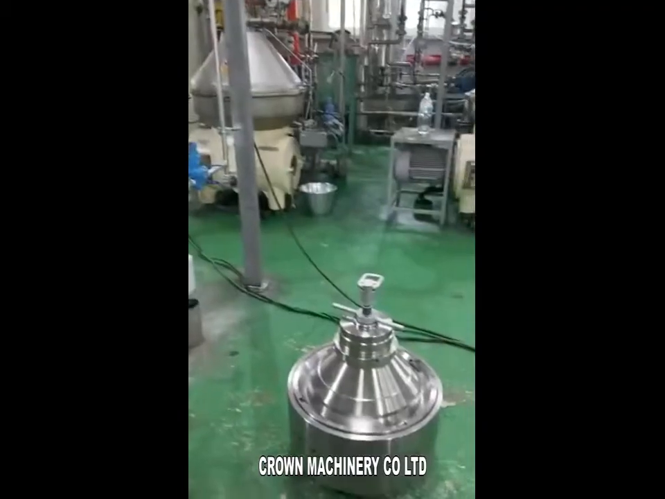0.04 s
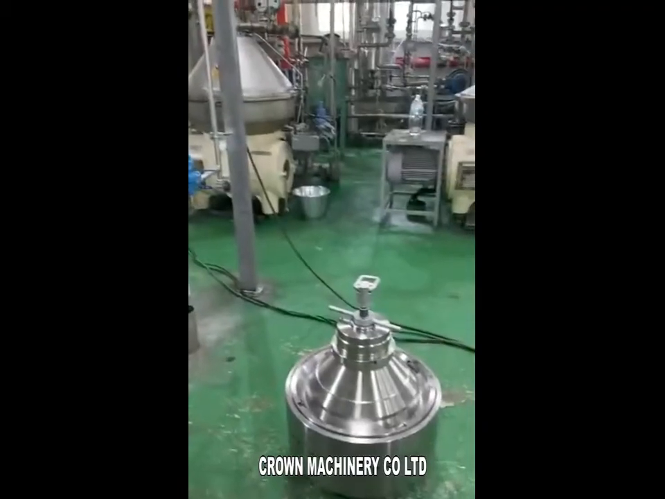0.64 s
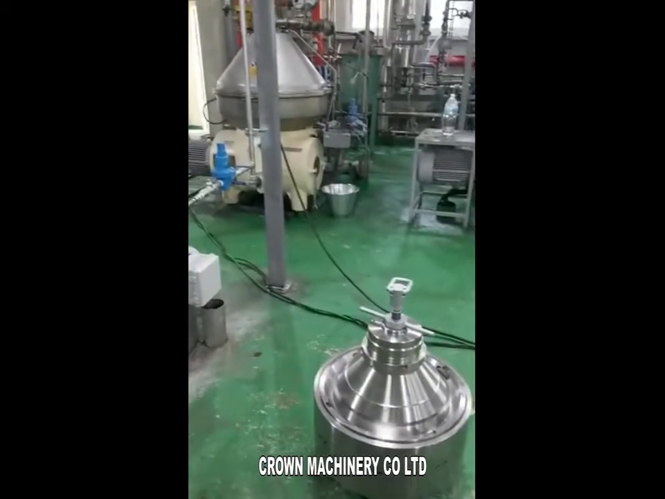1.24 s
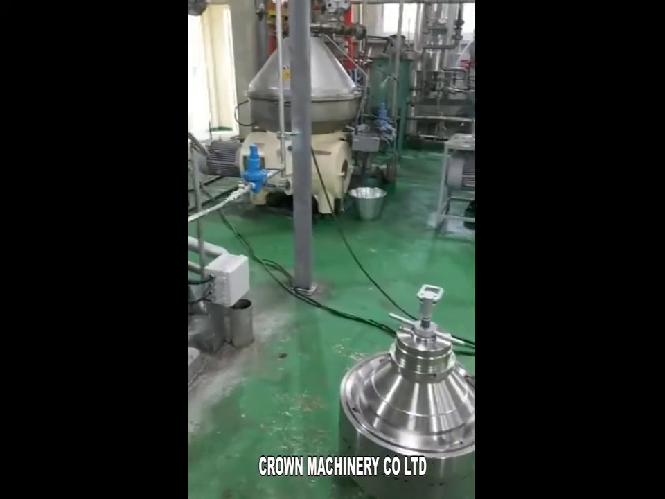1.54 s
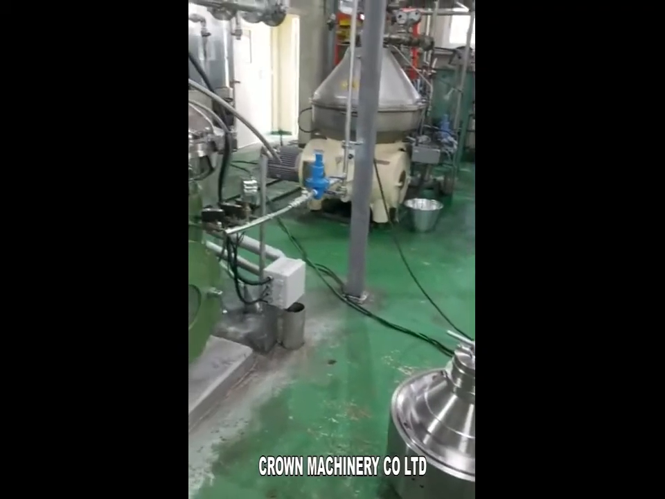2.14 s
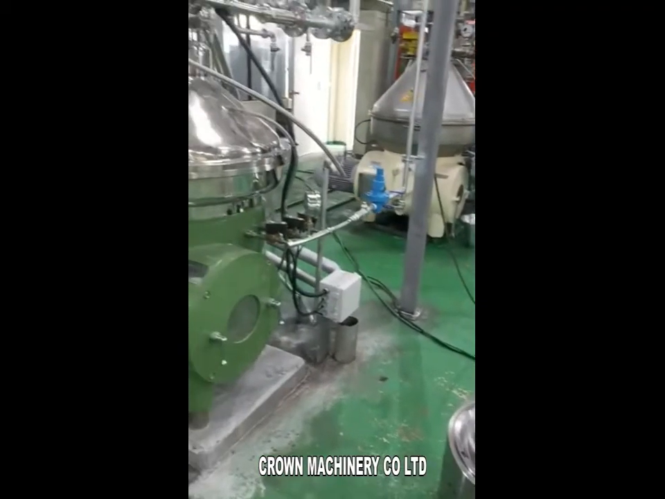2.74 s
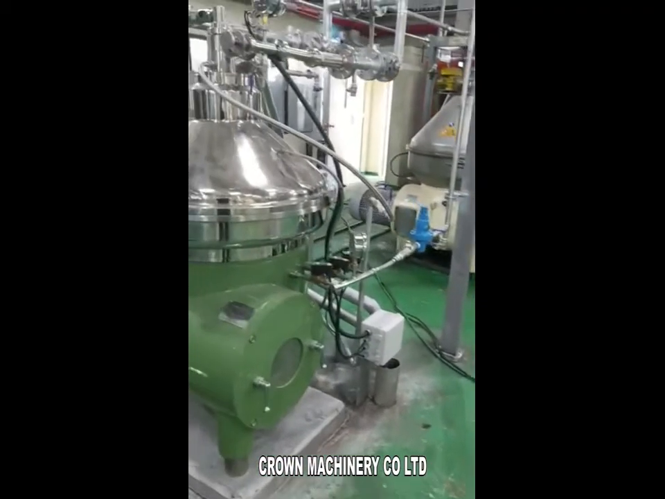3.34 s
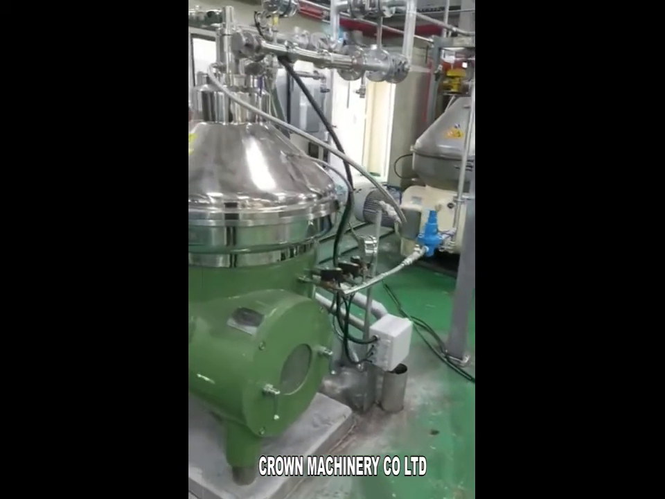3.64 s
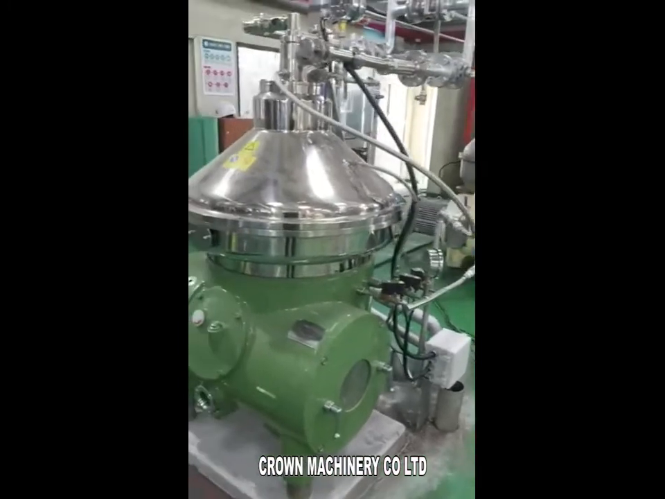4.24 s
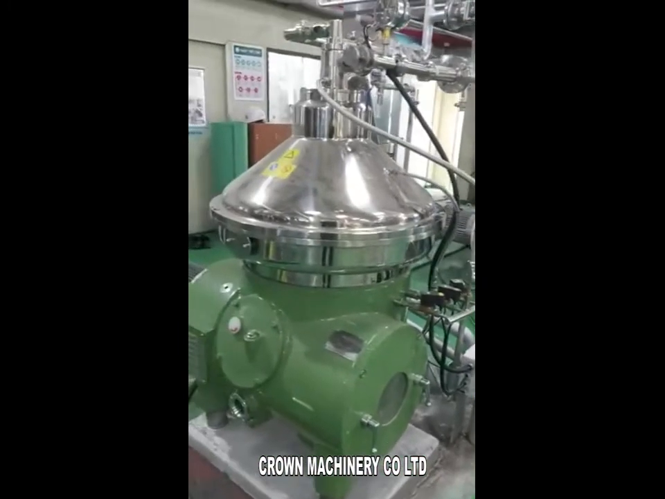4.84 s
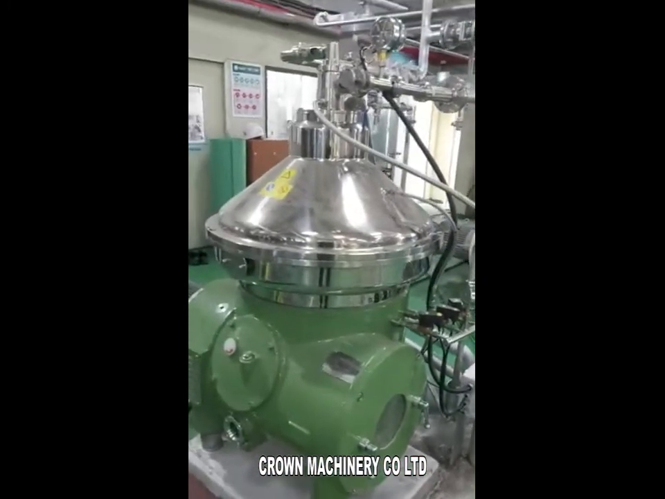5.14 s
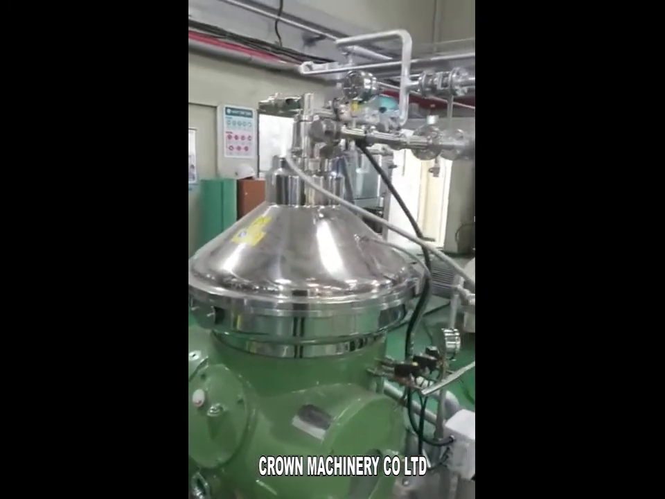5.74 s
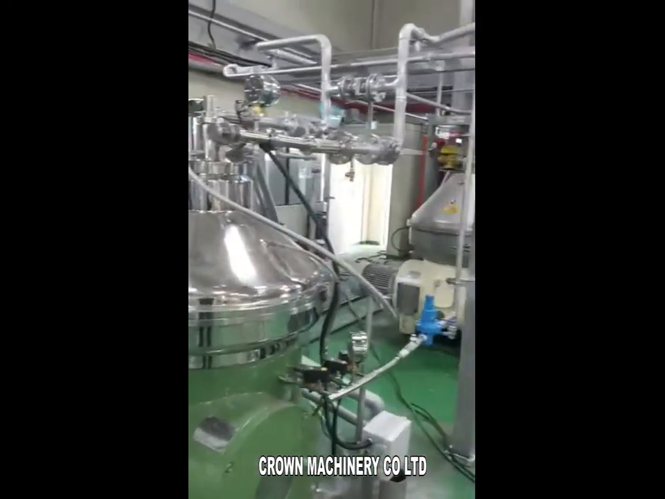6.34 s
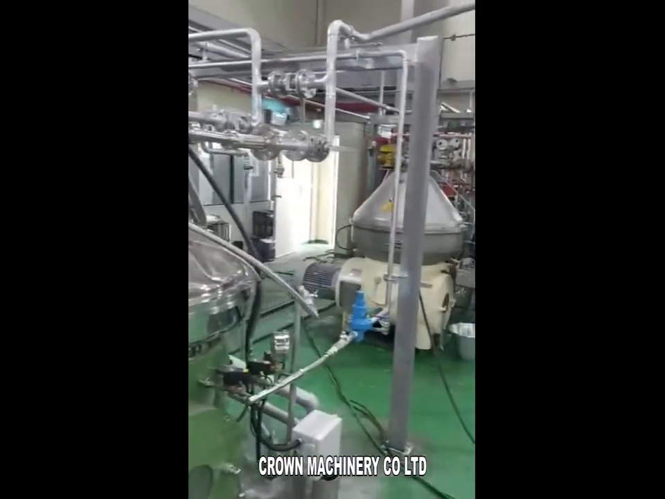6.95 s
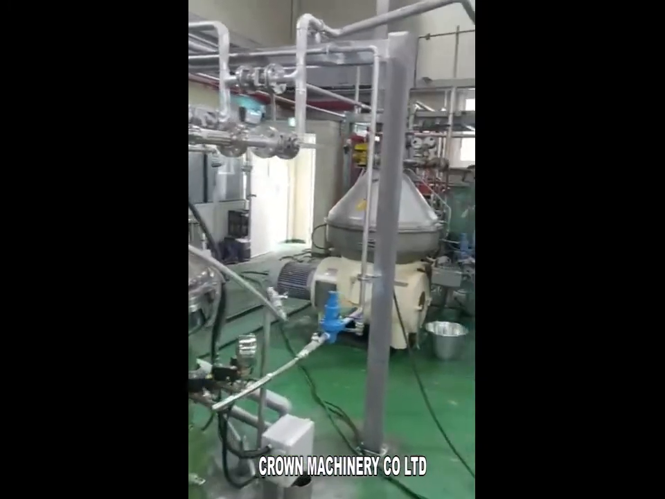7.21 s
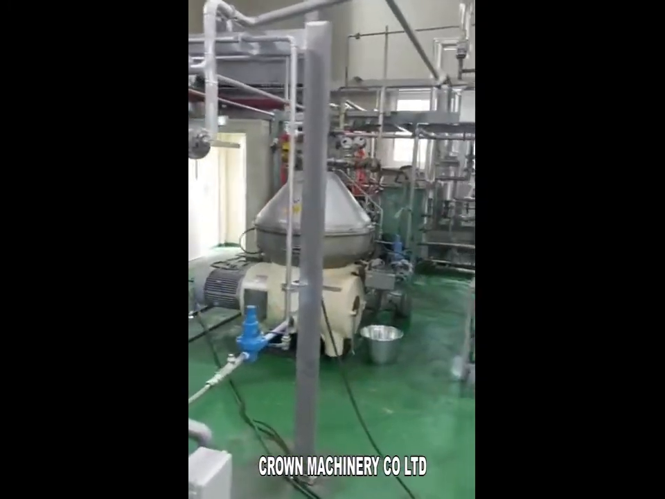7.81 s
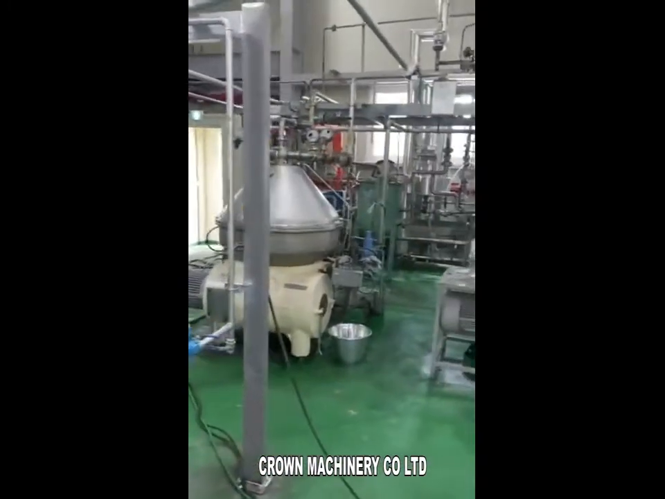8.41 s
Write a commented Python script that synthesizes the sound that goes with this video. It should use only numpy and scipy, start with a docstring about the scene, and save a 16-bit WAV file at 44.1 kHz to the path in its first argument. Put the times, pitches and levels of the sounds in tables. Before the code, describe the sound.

Several industrial centrifuges run at full speed in a hard-walled hall. A loud, airy hiss with a fine flicker dominates, over a low rumble and a faint motor hum that slowly pulses. The noise swells in the first second, then holds. A pump's low tone grows a little clearer in the second half. The microphone turns slowly among the machines, with the sound spread wide around it.

```python
"""Disc-stack centrifuges in a hard-walled hall

The listener turns slowly among machines at full speed. Air dragged along by the spinning bowls makes a
loud hiss. The hiss is heard with a fine flicker. Motors, gears and bowls hum through the cast frames over
a low rumble. Two drives at nearly the same speed beat slowly, and a pump's vane tone grows clearer."""
import sys
import numpy as np
from scipy import signal
from scipy.fft import rfft, irfft, next_fast_len
from scipy.io import wavfile
from scipy.ndimage import uniform_filter1d, map_coordinates

SR = 44100
rng = np.random.default_rng(int(sys.argv[2]) if len(sys.argv) > 2 else 0)


def unload_wav(signal):
    """Save mono or channel-first audio to the path in sys.argv[1] as 16-bit WAV at rate SR, clipped to [-1, 1]."""
    wavfile.write(
        sys.argv[1],
        SR,
        np.round(np.clip(np.atleast_2d(signal).T, -1, 1) * 32767).astype(np.int16),
    )


N = 373736


# Spectrum of the air rushing round the bowls. Each row: frequency in Hz, relative density in dB.
WINDAGE_SPECTRUM = [(800, -19.5), (1130, -9.5), (1280, -4), (1500, -2), (1950, -2), (2250, -3.5),
                    (2550, -5.5), (3000, -4.5), (3550, -2.5), (3950, 0), (4550, -0.4), (5100, -3.5),
                    (6400, -3.5), (7500, -6.5)]

def windage(treble_edge_hz=5300, window=1024):
    """Modulated noise: a hiss of rushing air, given patchy flicker, brief dips and a flickering width."""
    left, right = diffuse_noise(from_db(at_hz(WINDAGE_SPECTRUM, bin_hz())))
    hz, times, cells = signal.stft([left + right, left - right], SR, nperseg=window)
    treble = (hz > treble_edge_hz)[:, None]
    # flicker and grain are capped, so they dip further than they swell
    flicker = np.minimum(patches(hz, times, width_hz=903, length_s=.022, trend_frames=9), .092)
    grain = [patches(hz, times, width_hz=80, length_s=.026, trend_frames=15) for _ in ("mid", "side")]
    grain = np.minimum(grain, .063)
    ringing = patches(hz, times, width_hz=40, length_s=.16, trend_frames=81)
    mottle = patches(hz, times, width_hz=110, length_s=.05, trend_frames=21)
    dips = np.minimum(mottle + .9, 0)   # only the deepest troughs remain
    texture_db = np.where(treble, 3.0, 1.1) * flicker + 6 * grain + 1.8 * ringing + 14 * dips
    gain = from_db(texture_db) * flickering_width(hz, times, treble)
    gain /= np.sqrt(np.mean(gain ** 2, axis=2, keepdims=True))   # every band keeps its mean power
    mid, side = signal.istft(cells * gain, SR, nperseg=window)[1][:, :N]
    return rms_one(np.array([mid + side, mid - side]))


def flickering_width(hz, times, treble, bias_db=-8.5, spread_db=20.5):
    """Constant-power panning between mid and side: the treble flickers between narrow and wide."""
    flicker = patches(hz, times, width_hz=560, length_s=.026, trend_frames=9)
    side_ratio = from_db(treble * (bias_db + spread_db * flicker))
    return np.array([np.ones_like(side_ratio), side_ratio]) / np.sqrt(1 + side_ratio ** 2)


# Spectrum of the hall's rumble. Each row: frequency in Hz, relative density in dB.
RUMBLE_SPECTRUM = [(15, -30.5), (28, -9), (45, -4.5), (66, 2.5), (90, -0.5), (130, 0), (150, -2), (230, -3),
                   (275, -5.5), (320, -10), (450, -9.7), (560, -11), (800, -9.5), (1100, -14), (2000, -30)]

def rumble():
    """Reverberation: the hall blurs the vibration of all the machines into a dull roar."""
    return rms_one(diffuse_noise(from_db(at_hz(RUMBLE_SPECTRUM, bin_hz()))))


# Modes of the frames and hoods. Each row: centre in Hz, width in Hz, level in dB re the hall level.
FRAME_MODES = [(178.3, 45, -18), (258, 81, -27.5), (388, 20, -30), (637, 56, -26.5)]

def frame_resonances():
    """Forced resonance: bearing noise keeps the cast frames and steel hoods ringing."""
    hz = bin_hz()
    response = sum(from_db(db) / np.sqrt(width) / (1 + (2 * (hz - centre) / width) ** 2)
                   for centre, width, db in FRAME_MODES)
    total_rms = np.sqrt(sum(from_db(db) ** 2 for _, _, db in FRAME_MODES))
    return total_rms * rms_one(diffuse_noise(response))


BOWL_SHAFT_HZ, PUMP_SHAFT_HZ = 60.26, 59.26
# Shaft drone along the listener's way. Each row: time in seconds, level in dB before beating.
SHAFT_LEVELS = [(0, -56), (.25, -56), (.6, -41.5), (.8, -48), (1.0, -43.5), (1.4, -51), (1.85, -47.5),
                (2.2, -46), (2.7, -46), (3.3, -52.5), (3.7, -59), (4.0, -44), (4.4, -55), (4.9, -45),
                (5.4, -54), (5.8, -50), (6.15, -50), (7.0, -60), (7.75, -46), (8.25, -55), (8.47, -56)]

def shaft_drone():
    """Rotating unbalance: each drive shakes its frame once per turn."""
    drone = tone(BOWL_SHAFT_HZ, waver_db=2.2, waver_hz=2.4, phase_rad=.4)
    return envelope(SHAFT_LEVELS) * beating(harmonic=1, share=.52, in_step_s=4.91) * drone


# Motor hum along the listener's way. Each row: time in seconds, level in dB before beating.
HUM_LEVELS = [(0, -60), (1.4, -60), (2.1, -47.5), (3.5, -49), (3.85, -48), (4.25, -59), (4.6, -47),
              (5.35, -52), (5.75, -57), (6.05, -50), (6.4, -58), (6.85, -49), (7.3, -47), (8.47, -50.5)]

def motor_hum():
    """Second harmonic: the two motors hum at twice their shaft speed."""
    hum = tone(2 * BOWL_SHAFT_HZ, waver_db=0, waver_hz=2.7, phase_rad=.4)
    return envelope(HUM_LEVELS) * beating(harmonic=2, share=.53, in_step_s=4.77) * hum


def beating(harmonic, share, in_step_s):
    """Interference: the weaker drive, at a share of the other's amplitude, slips in and out of step."""
    slip = 2 * np.pi * harmonic * (BOWL_SHAFT_HZ - PUMP_SHAFT_HZ) * (seconds() - in_step_s)
    return np.abs(1 + share * np.exp(1j * slip))


# The feed pump's tone along the listener's way. Each row: time in seconds, level in dB.
PUMP_LEVELS = [(0, -52), (.35, -50), (.65, -67), (1.2, -48), (1.6, -53.5), (2.2, -58), (2.85, -56.5),
               (3.15, -45), (3.38, -59), (3.62, -44.5), (3.8, -50), (4.05, -46), (4.4, -48.5), (4.72, -40),
               (5.08, -50.5), (5.4, -45), (5.9, -47), (6.15, -41), (6.5, -47), (6.78, -43), (7.1, -48),
               (7.45, -39.5), (8.47, -40)]

def feed_pump(vanes=4):
    """Vane-passing frequency: the pump sounds at its shaft speed times its number of vanes."""
    return envelope(PUMP_LEVELS) * tone(vanes * PUMP_SHAFT_HZ, waver_db=.1, waver_hz=.5, phase_rad=.15)


# Tones of a neighbouring bowl and of its gear. Each row: time in seconds, level in dB.
NEIGHBOUR_BOWL_LEVELS = [(0, -66.5), (2.4, -54.5), (3.1, -45), (3.7, -63), (4.3, -46.5), (5.4, -53.5),
                         (5.85, -44), (6.3, -55), (6.8, -45), (7.2, -59), (8.47, -55)]
NEIGHBOUR_GEAR_LEVELS = [(0, -68), (1.2, -58.5), (2.7, -58), (3.6, -64), (4.4, -54.5), (5.0, -57),
                         (5.6, -56), (6.4, -62), (8.47, -57.5)]

def neighbouring_machine():
    """Periodic vibration: a nearby bowl and its gear each radiate one tone."""
    bowl = envelope(NEIGHBOUR_BOWL_LEVELS) * tone(260.2, waver_db=0, waver_hz=1.4, phase_rad=.4)
    gear = envelope(NEIGHBOUR_GEAR_LEVELS) * tone(385.8, waver_db=.5, waver_hz=1.6, phase_rad=.83)
    return bowl + gear


# Brief surges of the machines' roar. Each row: peak time in seconds, centre in Hz, peak level in dB.
ROAR_SURGES = [(.95, 89, -39), (1.32, 400, -47), (1.43, 190, -39), (3.1, 89, -42.5), (3.33, 177, -41),
               (3.6, 185, -40), (4.45, 400, -48), (4.87, 161, -38), (5.53, 400, -45), (6.7, 96, -40.5),
               (7.15, 4100, -33), (7.24, 94, -41.5), (7.53, 178, -40), (7.78, 90, -43)]

def surges(half_length_s=.08):
    """Amplitude modulation: one band of the roar swells and fades under a Gaussian envelope."""
    t, out = seconds(), np.zeros((2, N))
    noise = diffuse_noise(1)
    for peak_s, centre_hz, db in ROAR_SURGES:
        near = np.abs(t - peak_s) < 3 * half_length_s
        bell = np.exp(-((t[near] - peak_s) / half_length_s) ** 2)
        bandpass = signal.butter(4, [.75 * centre_hz, 1.25 * centre_hz], "band", fs=SR, output="sos")
        band = signal.sosfilt(bandpass, noise[:, near])
        out[:, near] += from_db(db) * rms_one(band * bell) * np.sqrt(np.mean(bell ** 2))
    return out


# Tones of farther bowls, gears and pumps. Each row: frequency in Hz, level in dB re the hall level.
DISTANT_TONES = [(107.7, -33), (181.0, -27.5), (219.4, -25), (327.0, -40), (415.5, -36.5), (542.4, -46),
                 (630.0, -33.5), (654.5, -32), (711.3, -33.5), (1066.6, -34), (1288.6, -44), (1413.1, -30),
                 (2378, -31.5)]

def distant_drives():
    """Superposition: unrelated tones from machines farther off add up to a faint, wavering chord."""
    return sum(from_db(db) * tone(hz, waver_db=3, waver_hz=.42, phase_rad=.71)
               for hz, db in DISTANT_TONES)


def gear_whine(peak_s=1.2, peak_db=-50.3, rest_db=-68, rise_db_per_s=8, fall_db_per_s=5.5):
    """Gear meshing: one thin tone rises to an early peak and fades to a faint resting level."""
    since_peak = seconds() - peak_s
    loss_db = np.maximum(-rise_db_per_s * since_peak, fall_db_per_s * since_peak)
    gain = from_db(np.maximum(peak_db - loss_db, rest_db))
    return gain * tone(438.1, waver_db=2, waver_hz=3.5, phase_rad=.35)


def tone(hz, waver_db, waver_hz, phase_rad):
    """Multipath interference: reflections make a tone's level waver and shift its phase at each side."""
    phase = 2 * np.pi * hz * seconds() + phase_rad * drift(waver_hz)
    phase_apart = np.arccos(coherence(hz)) / 2 * drift(waver_hz)
    pair = np.sin([phase + phase_apart, phase - phase_apart])
    return rms_one(pair * from_db(waver_db * drift(waver_hz)))


# The noise field's lean to the left. Each row: frequency in Hz, left minus right in dB.
BASS_LEAN = [(170, 0), (235, .8)]
UPPER_LEAN = [(560, 1), (1000, 0.5), (1850, 0), (2400, 2.5), (2900, 5.5), (3600, 2.5), (4600, 2), (5800, 6),
              (7500, 2)]

def diffuse_noise(gain):
    """Diffuse field: reverberant noise, shaped by a gain per frequency, is partly alike at both sides."""
    hz, sides = bin_hz(), np.array([[1], [-1]])
    mid, side = rfft(rng.standard_normal((2, 2 * (len(hz) - 1))))
    alike = coherence(hz)
    pair = np.sqrt(1 + alike) * mid + sides * np.sqrt(1 - alike) * side
    lean = from_db(sides * at_hz(BASS_LEAN + list(UPPER_LEAN), hz) / 2)
    return irfft(gain * pair * lean)[:, :N]


# Likeness of the left and right sides. Each row: frequency in Hz, correlation from -1 to 1.
BASS_COHERENCE = [(120, .998), (175, .99), (200, .9), (225, .8), (260, .8)]
UPPER_COHERENCE = [(300, 1), (400, 0.63), (750, 0.59), (1050, 0.037), (1600, -0.11), (2250, 0.21),
                   (3150, -0.11), (4800, 0.031), (6000, 0.27), (7500, 0.36)]

def coherence(hz):
    """Spatial coherence: long waves reach both sides nearly alike, short ones do not."""
    return np.clip(at_hz(BASS_COHERENCE + list(UPPER_COHERENCE), hz), -1, 1)


def patches(hz, times, width_hz, length_s, trend_frames):
    """Random modulation of rms 1 over frequency and time, in patches of the given width and length."""
    field = rng.standard_normal((512, 1024))
    places = np.meshgrid(hz / width_hz, times / length_s, indexing="ij")
    chance = map_coordinates(field, places, order=1, mode="wrap")
    trend = uniform_filter1d(chance, trend_frames, axis=1)
    return rms_one(chance - trend)   # the level holds over longer times


def drift(rate_hz, hop=64, size=8192):
    """Low-pass noise: a smooth wander of spread about 1, changing about rate_hz times a second."""
    hz = np.fft.rfftfreq(size, hop / SR)
    slow = irfft(rfft(rng.standard_normal(size)) / np.sqrt(1 + (hz / rate_hz) ** 4))
    return np.interp(np.arange(N) / hop, np.arange(size), rms_one(slow))


def envelope(rows):
    """Gain at every sample, interpolated between rows of time in seconds and level in dB."""
    return from_db(np.interp(seconds(), *np.transpose(rows)))


def at_hz(rows, hz):
    """Interpolation of a spectrum table on a log-frequency axis."""
    known_hz, values = np.transpose(rows)
    return np.interp(np.log(np.maximum(hz, 1)), np.log(known_hz), values)


def bin_hz():
    """Frequencies of the grid on which noise is coloured."""
    return np.fft.rfftfreq(2 * next_fast_len(N // 2 + 1), 1 / SR)


def seconds():
    """Time of every sample."""
    return np.arange(N) / SR


def from_db(db):
    """Amplitude ratio of a level in decibels."""
    return 10 ** (np.asarray(db) / 20)


def rms_one(x):
    """Normalisation to rms 1."""
    return x / np.sqrt(np.mean(x ** 2) + 1e-20)


def scene():
    """Superposition: the pressures of hiss, rumble and hum add in the hall."""
    hall_level = envelope([(.36, -35.5), (1.17, -29)])   # the hall swells once, then holds
    turn_back = envelope([(6.7, 0), (9, .7)])   # slightly louder on turning to the open floor
    hall = from_db(6.4) * windage() + from_db(-9) * rumble() + frame_resonances() + distant_drives()
    roar = hall_level * turn_back * hall + surges()
    return roar + shaft_drone() + motor_hum() + feed_pump() + neighbouring_machine() + gear_whine()


def record(dry, cutoff_hz=7540):
    """Band limiting: an elliptic low-pass filter cuts the top steeply."""
    return signal.sosfilt(signal.ellip(18, .1, 90, cutoff_hz, fs=SR, output="sos"), dry)


dry = scene()
out = record(dry)
unload_wav(out)
```